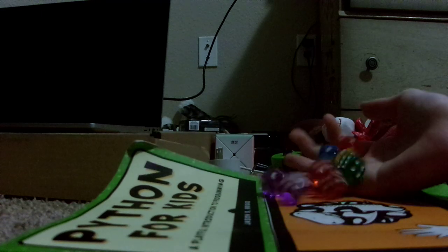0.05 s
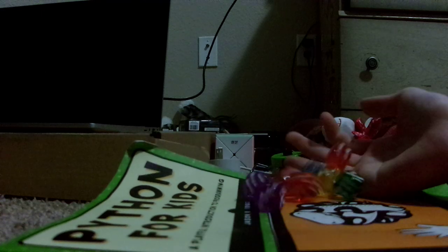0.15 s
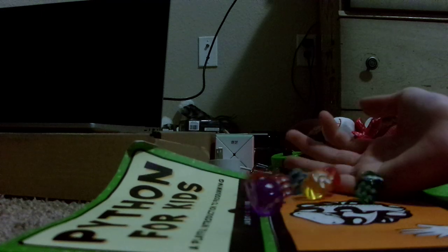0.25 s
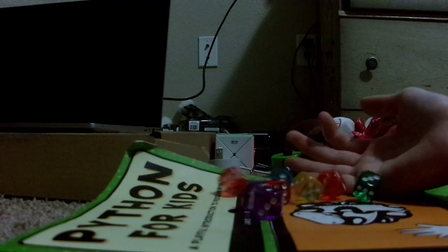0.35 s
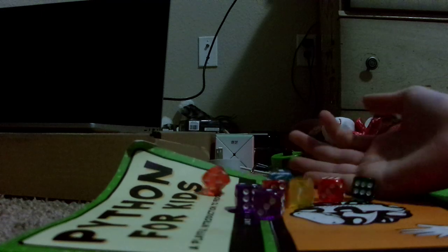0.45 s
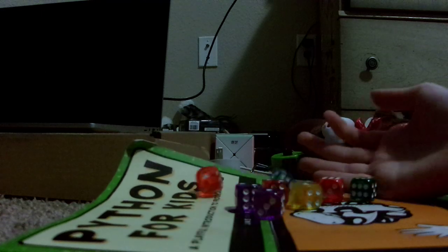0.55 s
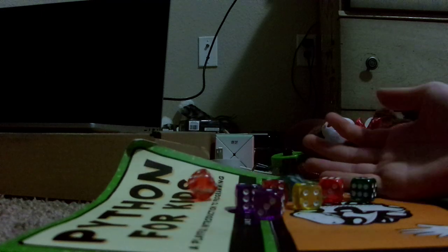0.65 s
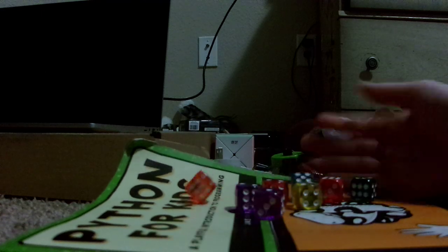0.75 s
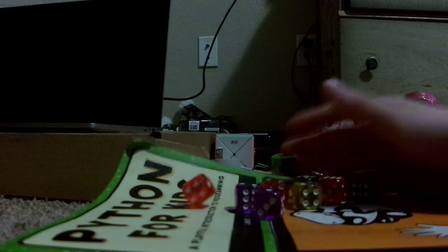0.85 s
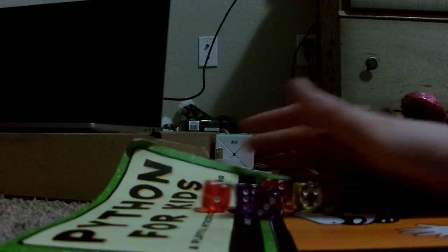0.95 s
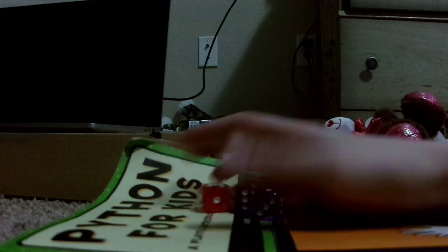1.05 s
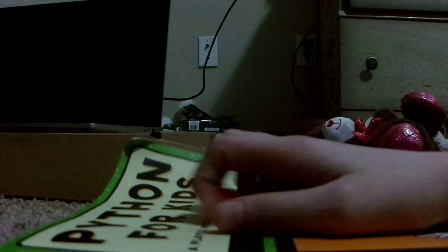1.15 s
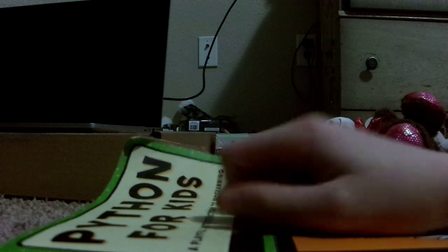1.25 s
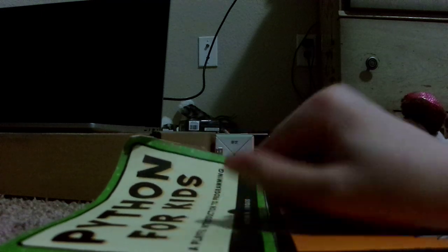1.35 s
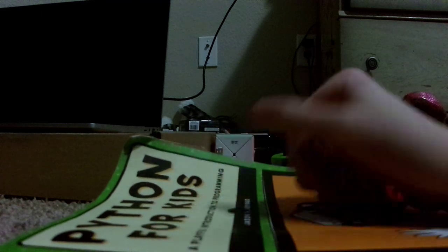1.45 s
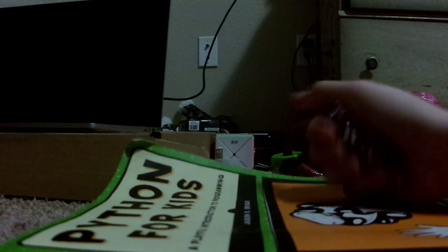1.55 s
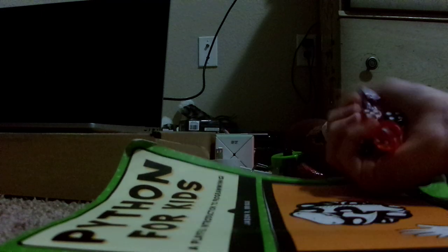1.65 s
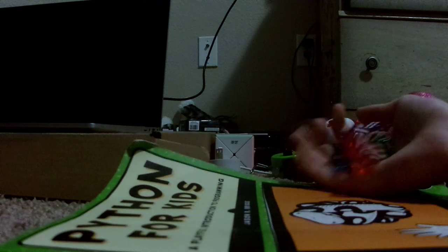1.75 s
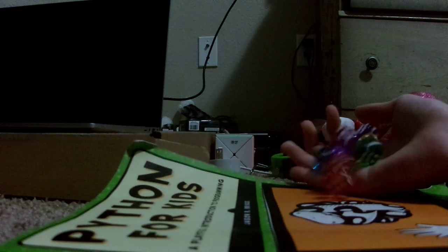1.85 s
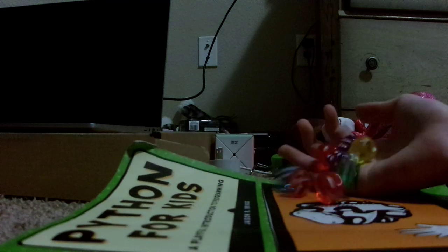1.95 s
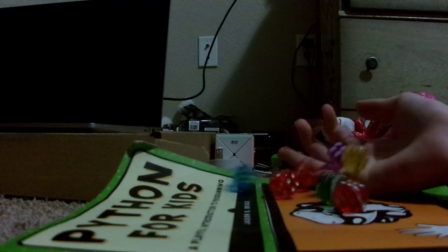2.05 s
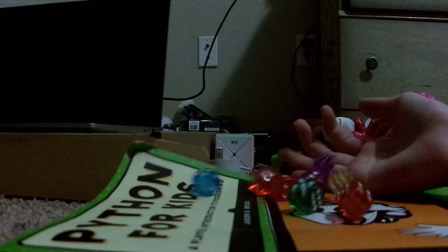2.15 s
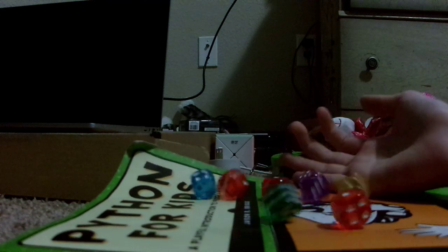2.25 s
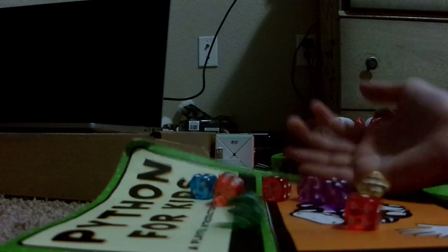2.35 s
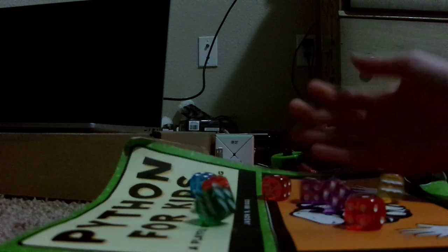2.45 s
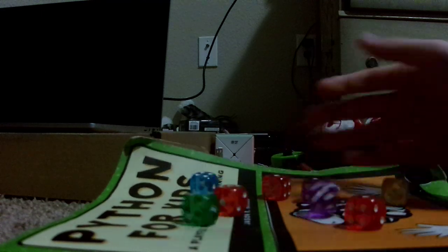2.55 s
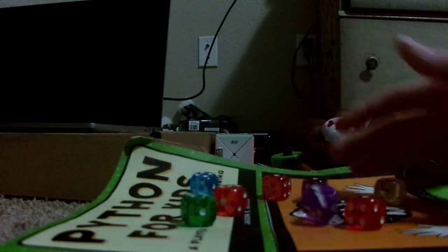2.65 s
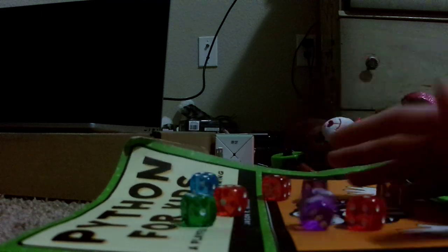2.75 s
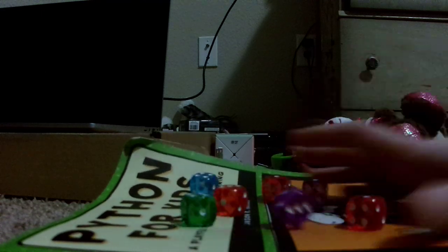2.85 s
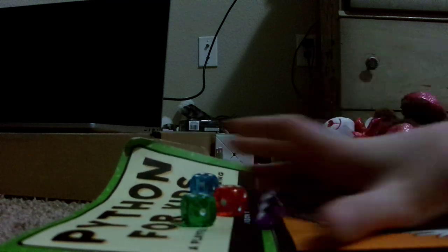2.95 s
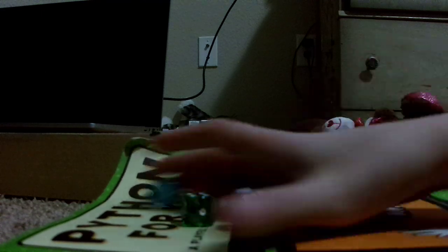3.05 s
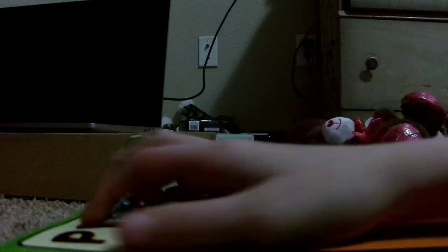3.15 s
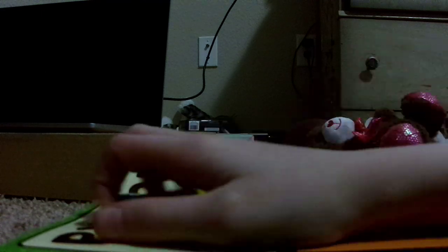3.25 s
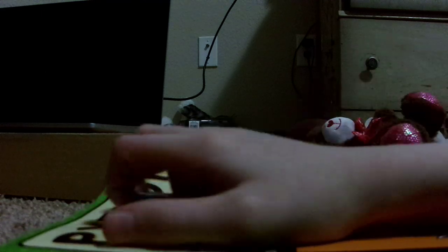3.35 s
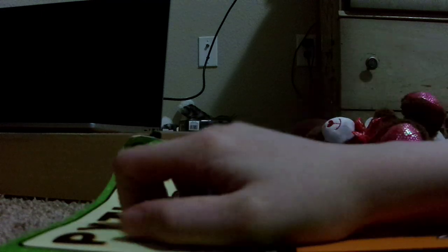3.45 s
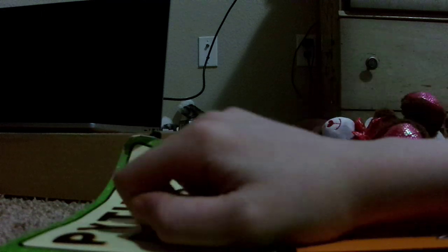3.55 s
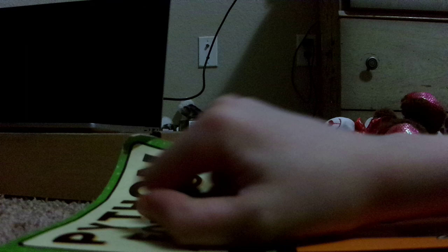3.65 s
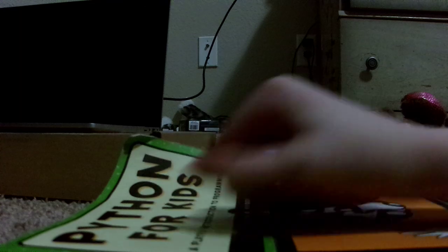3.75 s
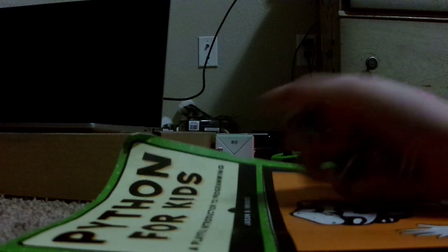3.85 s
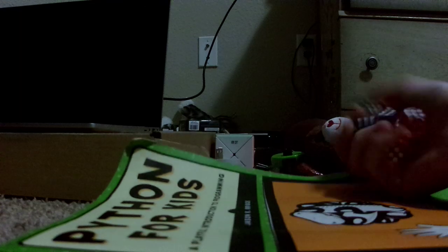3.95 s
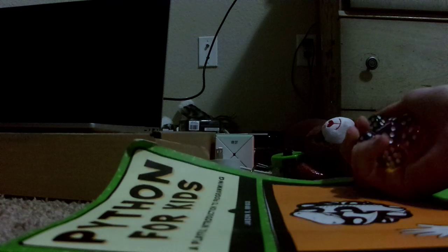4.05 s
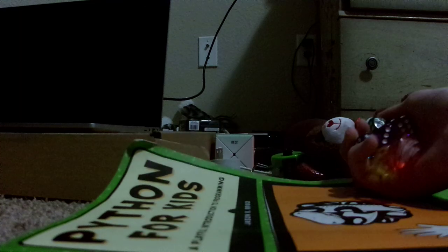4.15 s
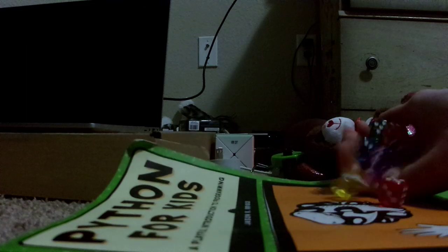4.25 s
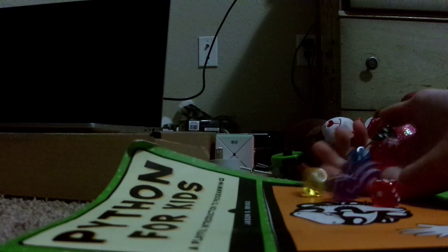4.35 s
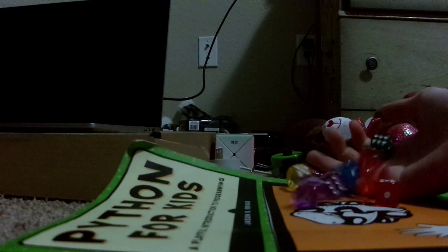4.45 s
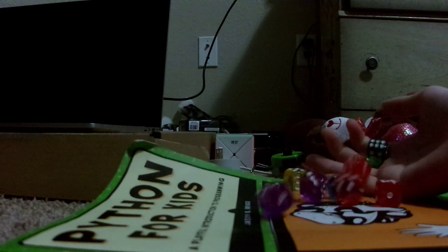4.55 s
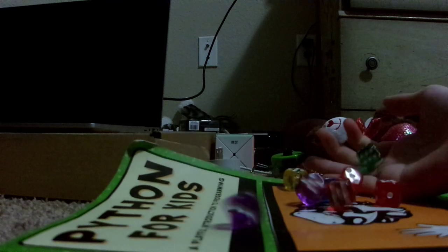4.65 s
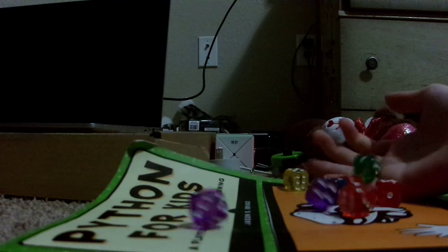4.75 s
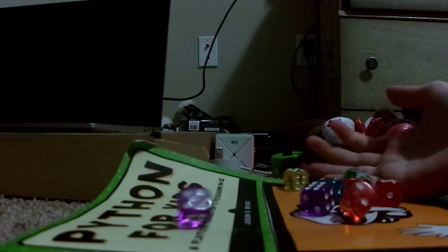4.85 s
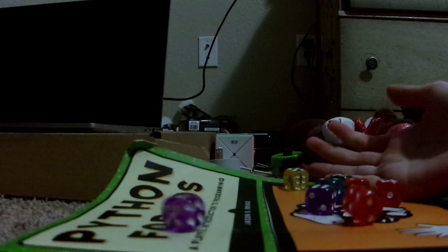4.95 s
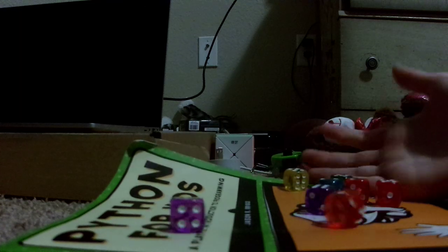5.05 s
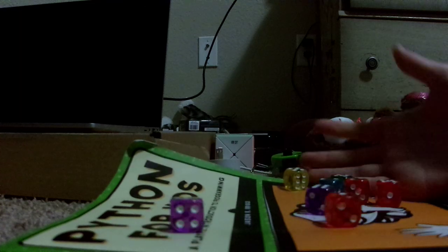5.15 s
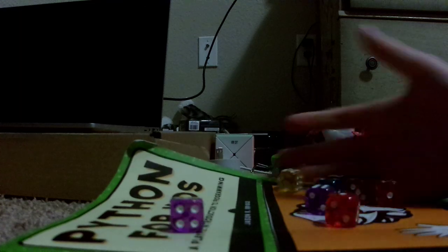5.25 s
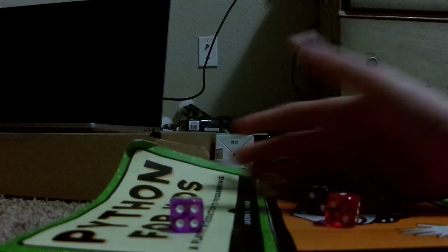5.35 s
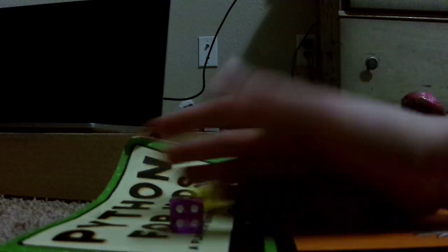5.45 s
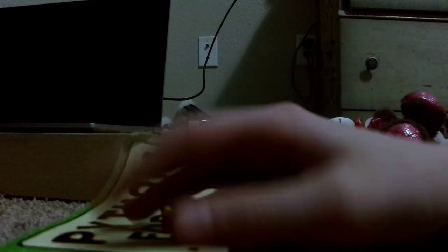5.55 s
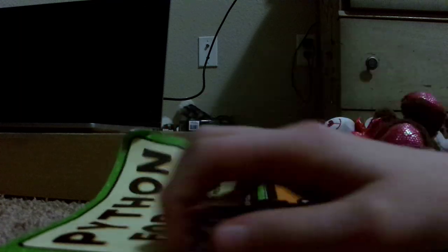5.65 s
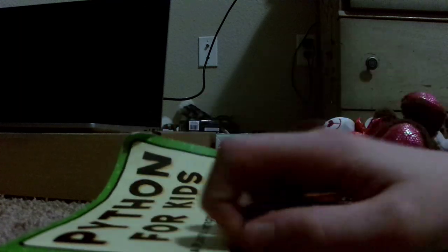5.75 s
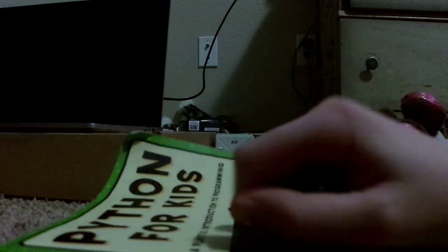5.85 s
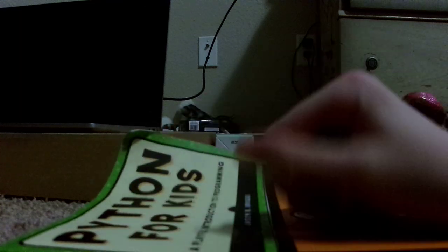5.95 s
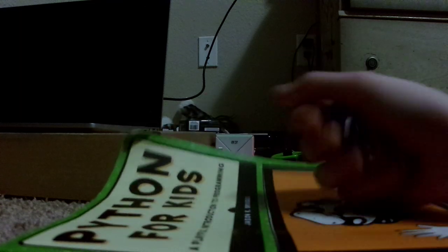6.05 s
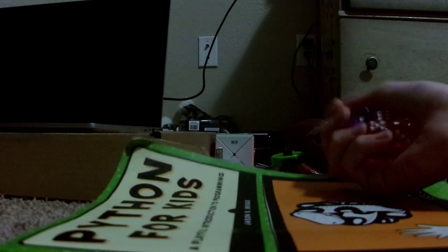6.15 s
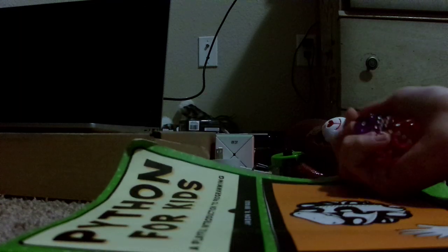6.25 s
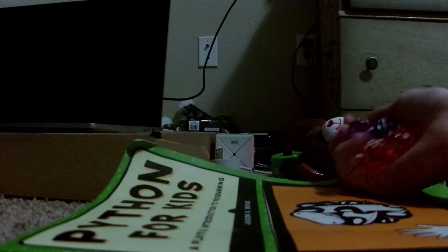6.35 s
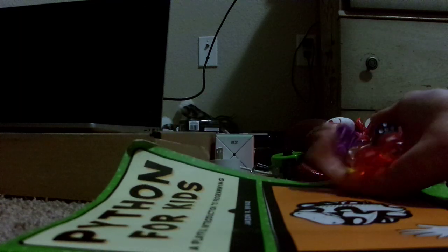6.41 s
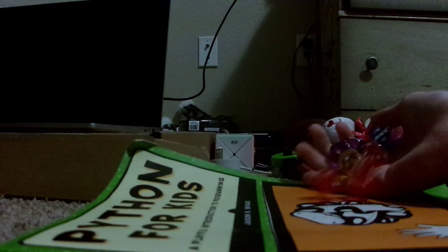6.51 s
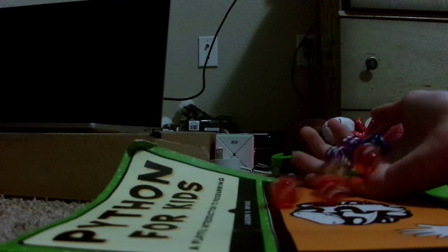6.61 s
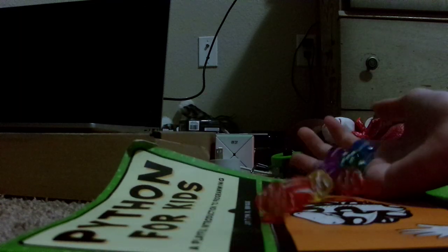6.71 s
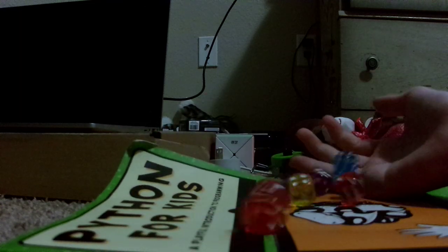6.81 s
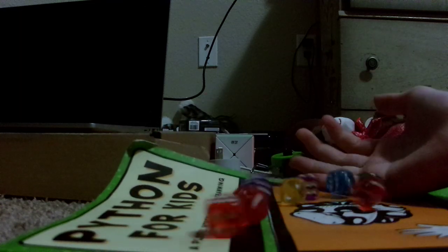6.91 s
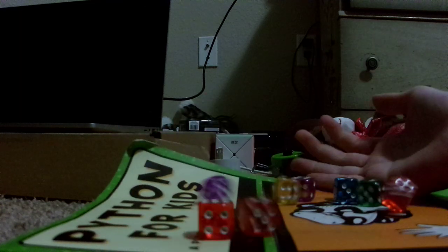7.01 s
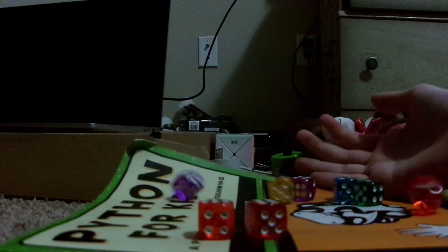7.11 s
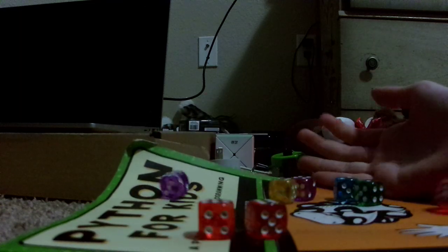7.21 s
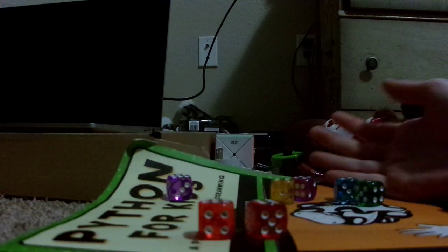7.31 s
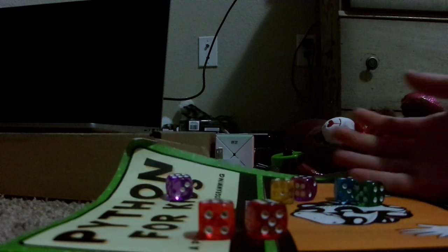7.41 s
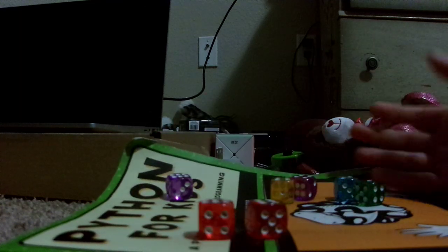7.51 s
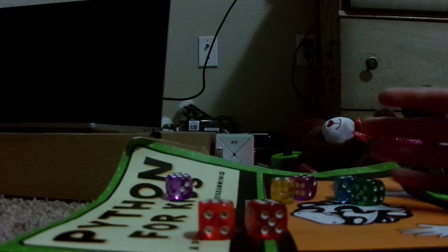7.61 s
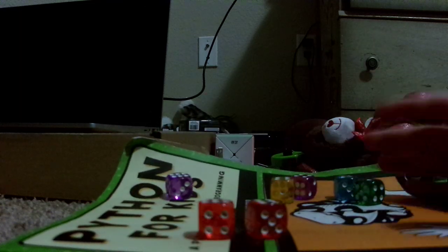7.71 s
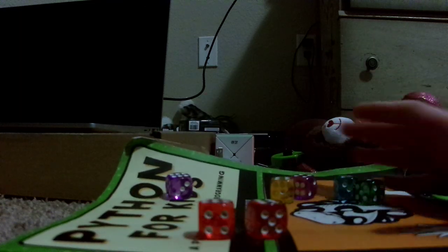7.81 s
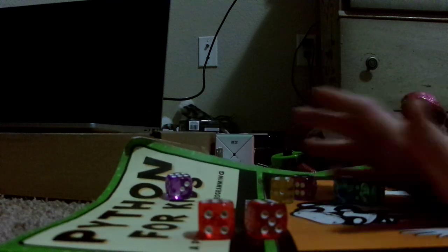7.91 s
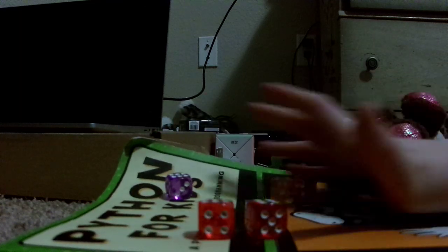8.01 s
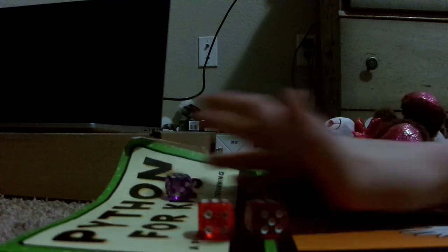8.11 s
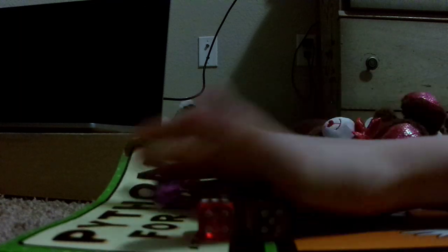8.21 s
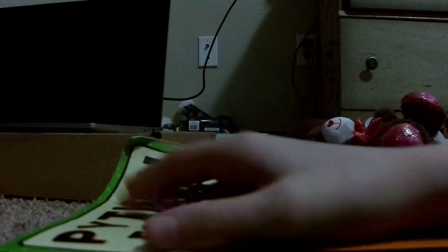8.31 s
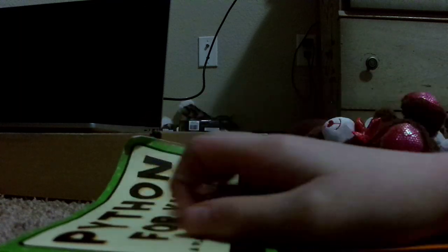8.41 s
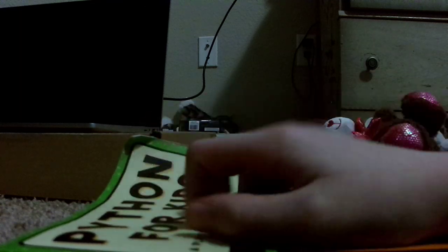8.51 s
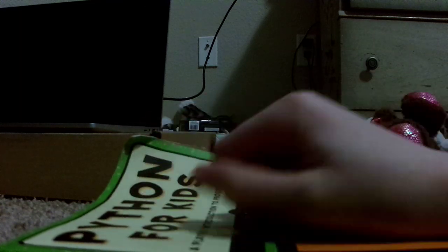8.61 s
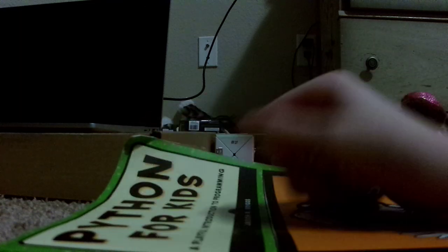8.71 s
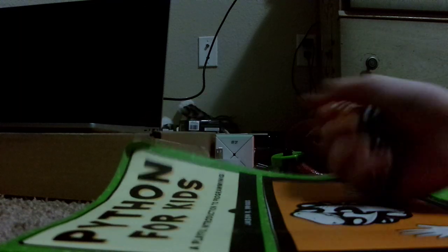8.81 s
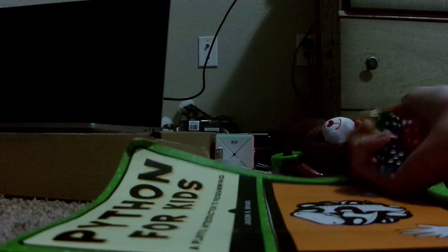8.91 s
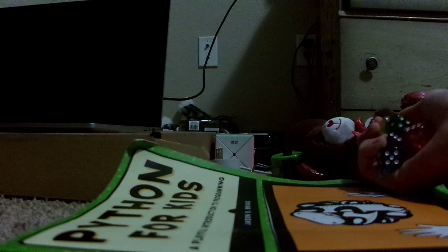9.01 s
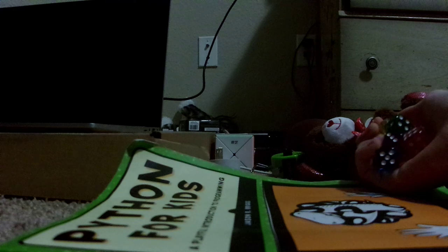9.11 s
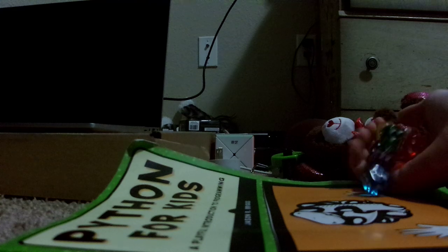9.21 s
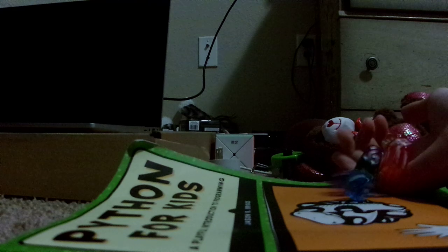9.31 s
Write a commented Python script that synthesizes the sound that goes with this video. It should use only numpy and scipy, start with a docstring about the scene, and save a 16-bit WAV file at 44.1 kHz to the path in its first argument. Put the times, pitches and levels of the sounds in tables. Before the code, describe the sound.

Close and dry in a small furnished room with faint low hum and soft hiss. At 0 s a handful of plastic dice is already spilling onto a hardback book, short hollow drumming and sharp clicks thinning out by about 0.6 s. From 1.0 to 1.3 s a hand rakes them up in a dense, bright clatter with scraping; they click in the palm until the second throw at 1.9 s, which settles near 2.7 s. Another rake, 2.9 to 3.5 s, peaks sharply around 3.3. After a muffled shuffle at 4.0, the third throw tumbles from 4.2 to 5.1 s. The sweep at 5.3 to 5.8 s is the loudest, crowded with clicks. A duller handling leads to the fourth throw, 6.5 to 7.1 s, then a quieter pause with light rustling. Dice are gathered at 8.0 to 8.6 s, shuffled at 8.9, and dropped again from 9.2 s.

```python
"""Dice thrown on a hardback book

Plastic dice are tipped from a hand onto a book lying on carpet, tumble to a stop, are swept up and thrown
again. Short damped modes make the clicks between dice, the drumming of the cover and the tap on it. Shaped
noise makes the rustle of hand and dice, the short noisy tail after each click, the still air and the hiss of
the microphone. A small furnished room answers the blows; a machine hums faintly; a small microphone listens
close by."""
import sys
import numpy as np
from scipy import signal
from scipy.fft import rfft, irfft, next_fast_len
from scipy.io import wavfile
from scipy.ndimage import uniform_filter1d, map_coordinates

SR = 44100
rng = np.random.default_rng(int(sys.argv[2]) if len(sys.argv) > 2 else 0)


def bounce(signal):
    """Save signal as a 16-bit WAV file at the path given by the first command-line argument."""
    frames = np.transpose(np.atleast_2d(signal))
    limited = np.clip(frames, -1, 1)
    pcm = np.round(limited * 32767).astype(np.int16)
    wavfile.write(sys.argv[1], SR, pcm)


N = 413216

# Levels are nominal: each source adds its own offsets and chance spread.
# dice thrown onto the cover: (start [s], time to rest [s], rolling level [dB])
THROWS = [(-0.05, 0.57, -48), (1.929, 0.78, -48.5), (4.24, 0.98, -50.5), (6.66, 0.87, -53),
          (9.299, 0.52, -56)]
# hand stroking or raking the cover: (peak [s], swell [s], fade [s], dull level [dB], bright level [dB])
SWEEPS = [(0.95, 0.074, 0.3, -89, -50.5), (1.12, 0.047, 0.19, -43.5, -38), (1.2, 0.13, 0.17, -40, -38),
          (1.28, 0.44, 0.044, -40, -44.5), (2.92, 0.11, 0.72, -56, -48.5), (3.15, 0.16, 0.52, -47, -47.5),
          (3.32, 0.049, 0.074, -40.5, -46), (3.404, 0.022, 0.02, -42.5, -26.5),
          (3.46, 0.18, 0.094, -60.5, -47.5), (5.33, 0.061, 0.49, -60.5, -41),
          (5.55, 0.27, 0.38, -46.5, -59), (5.7, 0.11, 0.144, -42.5, -37), (7.46, 0.23, 0.48, -67, -55.5),
          (7.85, 0.13, 0.042, -70, -48.5), (7.97, 0.29, 0.13, -65, -50), (8.084, 0.12, 0.53, -51, -45),
          (8.482, 0.19, 0.1, -40, -42.5), (8.586, 0.074, 0.099, -47, -46.5)]
# dice shifting while bunched in the palm or on the cover: (peak [s], swell [s], fade [s], dull [dB], bright [dB])
HANDFULS = [(1.78, 0.26, 0.15, -54, -55), (4.017, 0.037, 0.042, -48, -45), (4.843, 0.032, 0.02, -53, -71),
            (6.234, 0.21, 0.089, -67.5, -62.5), (6.33, 0.026, 0.063, -56, -77),
            (6.52, 0.11, 0.15, -56, -55.5), (8.921, 0.03, 0.14, -49.5, -59), (9.213, 0.025, 0.3, -52, -82),
            (9.303, 0.077, 0.072, -46.5, -45)]
# clear bounces on the cover: (time [s], drum level [dB], tap level [dB])
LANDINGS = [(0.016, -26, -29), (0.0357, -25.5, -25.5), (0.09, -32, -33), (0.1129, -29.5, -27),
            (0.1495, -25, -25), (0.1961, -20.5, -21.5), (0.2086, -28, -23), (0.2926, -27, -24.5),
            (0.323, -28, -35), (0.3403, -28, -35), (0.3699, -43, -35.5), (0.4268, -37, -40.5),
            (0.506, -36, -43), (0.6382, -32, -34.5), (0.847, -37.5, -35), (0.895, -42, -51),
            (1.862, -23.5, -24), (1.901, -17, -22), (1.9442, -29, -25.5), (1.9776, -24, -25.5),
            (2.0284, -45, -42), (2.0518, -29.5, -26.5), (2.072, -24, -25.5), (2.124, -29, -25),
            (2.2004, -27, -25.5), (2.2289, -29.5, -42), (2.343, -39, -36), (2.3881, -34, -58),
            (2.4123, -38.5, -44), (2.563, -36.5, -42), (2.5984, -39.5, -36.5), (2.646, -37.5, -41),
            (3.1184, -27.5, -24), (3.315, -24, -20.5), (4.2145, -19, -22), (4.223, -23.5, -25),
            (4.265, -32, -30), (4.3019, -33, -35), (4.3244, -26.5, -26.5), (4.366, -40, -39),
            (4.3905, -21, -24), (4.455, -29, -38), (4.4829, -26, -26.5), (4.494, -27.5, -26),
            (4.5296, -28.5, -29), (4.6006, -22.5, -24.5), (4.653, -30, -27), (4.6619, -30, -31.5),
            (4.694, -36.5, -38), (4.7582, -35, -36.5), (4.8627, -32.5, -31.5), (4.9006, -37, -36.5),
            (4.958, -39.5, -38.5), (5.0252, -38.5, -37), (5.5254, -30.5, -25.5), (5.5687, -29, -29),
            (5.6079, -28, -28), (6.507, -24, -27.5), (6.5475, -22.5, -22.5), (6.578, -30.5, -34.5),
            (6.6515, -22.5, -22.5), (6.6913, -32, -36), (6.6997, -23.5, -23), (6.7448, -26, -23),
            (6.777, -29, -32), (6.794, -27.5, -31), (6.8164, -27, -19), (6.919, -21.5, -30.5),
            (6.954, -25, -29), (7.043, -34, -37.5), (7.533, -44, -46), (8.3545, -31, -57),
            (8.471, -33, -35), (8.58, -32.5, -33.5), (9.2325, -23, -27.5), (9.2915, -25.5, -24),
            (9.3613, -24, -24)]
# clear contacts between dice: (time [s], level [dB], upper over lower modes [dB])
CLICKS = [(0.026, -24.5, 6), (0.0539, -20.5, 0.5), (0.0763, -29.5, -4), (0.0885, -21.5, 2.5),
          (0.138, -28.5, -1), (0.2259, -35.5, -3.5), (0.2445, -32.5, -1), (0.2522, -18.5, -5),
          (0.2964, -14, 7.5), (0.3475, -21, 25), (0.4588, -29, 10), (0.6416, -24, -6.5), (0.984, -16, 32),
          (0.9995, -13.5, 12.5), (1.0642, -21, 23), (1.0687, -15.5, 9), (1.076, -29, 20),
          (1.0881, -17.5, 3), (1.099, -21, 7), (1.104, -27.5, 30), (1.113, -18.5, 5), (1.1325, -23, 6),
          (1.1469, -19, -4), (1.1653, -20, -14.5), (1.1767, -16.5, -2), (1.1878, -19.5, 21.5),
          (1.1936, -13, -3.5), (1.1982, -19, -5.5), (1.22, -21, 11), (1.249, -22.5, -15),
          (1.2633, -10, 2.5), (1.3984, -30, -4), (1.423, -29.5, -18.5), (1.4812, -37.5, -8),
          (1.664, -14, 10), (1.696, -31.5, -19.5), (1.759, -26.5, 0.5), (1.7657, -21, 13),
          (1.7697, -15.5, 26), (1.7875, -25, -9.5), (1.8072, -22.5, 15), (1.8183, -32, 7),
          (1.83, -26.5, 12), (1.8814, -25.5, 7), (1.9227, -19.5, -6), (1.939, -29.5, -2.5),
          (1.9911, -30.5, -6.5), (2.1144, -24, 10), (2.1414, -24.5, -1), (2.1596, -25.5, 0.5),
          (2.2469, -27.5, -2), (2.494, -17, 4), (2.9258, -21, -4), (2.9465, -32.5, -8), (2.9589, -28, 0),
          (3.0593, -14, 3.5), (3.0893, -19, 0), (3.0964, -29, 9), (3.103, -23.5, 6), (3.1327, -29, 4),
          (3.154, -20.5, 11), (3.2042, -30.5, 7.5), (3.2172, -27.5, 12), (3.2427, -15, 1),
          (3.298, -24.5, -6.5), (3.3084, -10, 5), (3.3163, -24.5, -13), (3.33, -18.5, -5), (3.393, -22, 9),
          (3.4022, -17.5, 18.5), (3.4687, -30.5, 5), (3.4913, -23, 9), (3.9406, -30.5, -21),
          (3.9696, -27, -2), (3.989, -26, 2), (4.0087, -18, 7), (4.2194, -15.5, 10), (4.2825, -31.5, 1.5),
          (4.2927, -25.5, -9), (4.4065, -25.5, 14), (4.4339, -23.5, 19), (4.4559, -26.5, -6),
          (4.4612, -24, -13), (4.5195, -26, -2), (4.792, -16.5, -3.5), (4.83, -29.5, -5.5),
          (5.3048, -28.5, 1.5), (5.3157, -19, 25), (5.3224, -27, 20), (5.337, -15, 6.5), (5.3541, -18, 14),
          (5.3977, -23.5, 1), (5.414, -12.5, -1.5), (5.436, -19, -3), (5.4452, -16, -1),
          (5.4545, -7.5, 10.5), (5.5036, -20, -1.5), (5.5261, -13, 0.5), (5.6177, -19, 9.5),
          (5.6409, -21, 4.5), (5.6496, -17.5, 5), (5.6556, -14.5, 11), (5.6784, -13.5, 4),
          (5.6993, -22, -16.5), (5.703, -18, -10), (5.7242, -10.5, -6), (5.7427, -26.5, -9.5),
          (5.7764, -29.5, -1), (5.8044, -17.5, 0), (5.854, -25.5, -4.5), (5.913, -28, -15),
          (5.9413, -24.5, -16.5), (5.998, -31.5, -21), (6.194, -32, -22), (6.3069, -24.5, -12.5),
          (6.322, -32, -21), (6.416, -31.5, -11), (6.453, -26, -4), (6.4588, -30.5, -10), (6.4836, -26, 6),
          (6.6824, -23, 5), (6.7911, -30, -5), (6.863, -27, -7), (6.8834, -26, 13), (6.9915, -30, -7),
          (7.0666, -32.5, -10), (7.228, -36, 2), (7.9969, -24, 5.5), (8.0461, -19.5, 5.5), (8.0676, -22, 3),
          (8.0782, -17.5, 8), (8.089, -24, 10), (8.1894, -26, 2), (8.3556, -20, -8), (8.365, -23.5, 1),
          (8.384, -21.5, -4.5), (8.414, -21, -5), (8.4272, -22, 10), (8.4321, -11, 2), (8.444, -16.5, -10),
          (8.456, -13, 1), (8.465, -23.5, -4), (8.47, -17, -6), (8.4732, -16, 0), (8.48, -16, 5),
          (8.5673, -24.5, 4), (8.5753, -19, 1.5), (8.8398, -40.5, -16), (8.9059, -22.5, -11),
          (8.924, -34, -7), (8.9271, -21.5, -14), (8.9411, -25, -11), (9.203, -25, -20), (9.2471, -28, -8),
          (9.2517, -29.5, -11), (9.2944, -18.5, 10), (9.3082, -22.5, -1), (9.3133, -21, -1.5)]
# modes of the book cover: (frequency [Hz], relative level [dB], t60 [s])
COVER_MODES = [(264.6, -10.5, 0.066), (311.6, -4.5, 0.037), (350.8, 3.5, 0.029), (518, -13, 0.014),
               (750, -5.5, 0.016)]
# tap on the cover, the contact and then upper cover modes: (frequency [Hz], relative level [dB], t60 [s])
TAP_MODES = [(2150, 0, .0009), (900, -18, .007), (1500, -14, .005), (2600, -13, .003)]
# lower modes of a die: (frequency [Hz], relative level [dB], t60 [s])
DIE_LOW_MODES = [(3000, -4, .0014), (5100, 0, .0016)]
# upper modes of a die: (frequency [Hz], relative level [dB], t60 [s])
DIE_HIGH_MODES = [(6900, -1, .0012), (9600, 0, .0016), (13500, -5, .0008)]
# hollow of the hand around the dice: (frequency [Hz], relative level [dB], t60 [s])
HOLLOW_MODES = [(3100, 0, .008)]
# dull friction noise: (frequency [Hz], relative density [dB])
SCRAPE_SPECTRUM = [(600, -6.5), (1400, -5), (3500, -1.5), (9000, -24.5)]
# bright friction noise: (frequency [Hz], relative density [dB])
RUSTLE_SPECTRUM = [(4000, -14.5), (10000, 9.5), (16000, 6.5)]
# still air, lower part: (frequency [Hz], relative density [dB])
AIR_SPECTRUM = [(24, -53), (40, 1.5), (75, 1.5), (168, 0), (211, 0), (887, -19.5)]
# microphone hiss, treble: (frequency [Hz], relative density [dB])
TREBLE_SPECTRUM = [(2310, -21), (5000, -25), (10000, -27), (15300, -29), (16500, -45)]
# machine hum: (frequency [Hz], middle rms level [dB])
HUM_TONES = [(26.9, -57), (82, -65.5), (120, -66), (164, -62)]
# decay of the room: (frequency [Hz], t60 [s])
ROOM_DECAY = [(300, 0.25), (700, 0.14), (10000, 0.084)]

STEP = 32  # samples between control values
SPILL_S, SLOWING_DB_PER_S, SETTLE_S = 0.0097, 12, 0.026  # rise by 20 dB, loss while rolling, extra 20 dB fall at rest
PUSH_DB = -5  # rolling of raked dice, relative to the dull sweep
ROLL_DULL_DB, ROLL_BRIGHT_DB = -19, -20.5  # rustle relative to the rolling level
JOSTLE_ROLL_DB, JOSTLE_PALM_DB, JOSTLE_RAKE_DB = -3.5, 15, -0.5  # relative to rolling, dull handful, dull sweep
SKIN_PATCHY_DB = 1.5
STICK_SLIP_DB = 1.2  # extra unevenness of a firm rake
HOLLOW_DB, EDGE_DB = -9, -10.5  # hollow relative to a dull click; a die's low modes relative to its listed tap
BUZZ_DB, BUZZ_S = -16, 0.0015  # relative to the click; fade to 1/e
CHATTER_DB, CHATTER_GAP_SCALE_S, CHATTER_LOSS_DB = -9, .0009, 1.07  # start under the click, gap scale, loss a tick
PORT_HZ, PORT_WIDTH_HZ, TOP_HZ = 9810, 7460, 16000  # inlet resonance of the microphone and band limit


def amp(db):
    """Logarithmic level: decibels to gain."""
    return 10 ** (np.asarray(db) / 20)


def unit(x):
    """Power normalisation: scales to rms 1."""
    return x / np.sqrt(np.mean(x ** 2) + 1e-20)


def summed(levels_db):
    """Incoherent superposition: powers add."""
    return 10 * np.log10(sum(amp(db) ** 2 for db in levels_db) + 1e-11)


def along(points, hz):
    """Logarithmic frequency axis: interpolates (frequency, value) points."""
    f, value = np.transpose(points)
    return np.interp(np.log(hz + 1), np.log(f + 1), value)


def wobble(rate):
    """Slow random modulation: a smooth curve with rate knots a second."""
    knots = rng.standard_normal(int(N * rate / SR) + 4)
    return map_coordinates(knots, [np.arange(N) * rate / SR])


def filtered(x, response):
    """Linear filtering: the spectrum is multiplied by a response of frequency."""
    m = next_fast_len(N + 8192)
    return irfft(rfft(x, m) * response(np.fft.rfftfreq(m, 1 / SR)), m)[..., :N]


def highpass(x, hz):
    """Poor radiation by small bodies: bass is removed below hz."""
    return signal.lfilter(*signal.butter(2, hz, "high", fs=SR), x)


def hiss(spectrum, patchy_db):
    """Coloured noise of rms 1: random gain patches in time and frequency, then a spectral envelope."""
    z = signal.stft(rng.standard_normal(N + SR), nperseg=512)[2]
    field = uniform_filter1d(rng.standard_normal(z.shape), size=12, axis=0)
    field = uniform_filter1d(field, size=6, axis=1)
    x = signal.istft(z * amp(patchy_db * unit(field)), nperseg=512)[1][:N]
    return unit(filtered(x, lambda hz: amp(along(spectrum, hz))))


def struck(times, db, modes, size, rise_s, spread_db, detune):
    """Modal excitation: each blow lands elsewhere, so mode strengths and pitches change a little."""
    t = np.arange(size) / SR
    hz, level_db, t60 = np.transpose(modes)[:, None, :, None]
    chance = rng.standard_normal((len(times), 2, len(modes), 1))
    decay = amp(level_db + spread_db * chance[:, 0] - 60 * t / t60)
    ring = decay * np.sin(2 * np.pi * hz * np.exp(detune * chance[:, 1]) * t)
    ring = -ring.sum(axis=1) * (1 - np.exp(-t / rise_s))
    ring *= (amp(db) / np.abs(ring).max(axis=1))[:, None]
    at = np.round(np.asarray(times) * SR).astype(int)[:, None] + np.arange(size)
    return np.bincount(at.ravel(), ring.ravel(), N + size)[:N]


def scattered(count, spread_db):
    """Random impacts: sample positions, sizes in dB (many small, few large) and colours from -1 to 1."""
    draw = rng.random((count, 3))
    at = (draw[:, 0] * (N - 1)).astype(int)
    return at, -spread_db * np.log(draw[:, 1] + .04), 2 * draw[:, 2] - 1


def control_times():
    """Slow modulation sampled sparsely: seconds at which levels are worked out."""
    return np.arange(N // STEP + 1) * STEP / SR


def gestures(rows):
    """Exponential swell and fade: dull and bright levels change by 20 dB in the times given."""
    t = control_times()
    shapes = [(-20 * np.maximum((s - t) / swell_s, (t - s) / fade_s), db) for s, swell_s, fade_s, *db in rows]
    return [summed(shape + db[k] for shape, db in shapes).repeat(STEP)[:N] for k in range(2)]


def background():
    """Stationary noise and wavering tones: still air, microphone hiss and machine hum."""
    t = np.arange(N) / SR
    hum = 0
    for hz, db in HUM_TONES:
        gain = amp(db + 2.37 * wobble(7)) * np.sqrt(2)
        hum = hum + gain * np.sin(2 * np.pi * hz * t + .7 * wobble(9))
    return hum + amp(-61.5) * hiss(AIR_SPECTRUM + TREBLE_SPECTRUM, patchy_db=-2.0)


def rolling():
    """Energy loss in rolling: the level in dB as thrown dice spill, slow down evenly and come to rest."""
    t = control_times()
    levels_db = []
    for s, rest_s, db in THROWS:
        spill_db = 20 * np.maximum(s - t, 0) / SPILL_S
        slowing_db = SLOWING_DB_PER_S * np.maximum(t - s, 0)
        settle_db = 20 * np.maximum(t - s - rest_s, 0) / SETTLE_S
        levels_db.append(db - spill_db - slowing_db - settle_db)
    return summed(levels_db).repeat(STEP)[:N]


def tick(s, dull_db, bright_db):
    """Hard elastic impact: die modes last a millisecond or two; so small a body sends out no bass."""
    low = struck(s, dull_db, DIE_LOW_MODES, size=120, rise_s=.00006, spread_db=3.5, detune=.18)
    high = struck(s, bright_db, DIE_HIGH_MODES, size=120, rise_s=.00004, spread_db=3.5, detune=.1)
    return highpass(low + high, 2000)


def knock(s, drum_db, tap_db):
    """Damped plate modes: the cover drums with a dry tap; so small a board sends out no deep bass."""
    drum = struck(s, drum_db, COVER_MODES, size=3000, rise_s=.0032, spread_db=4, detune=.05)
    tap = struck(s, tap_db + 4, TAP_MODES, size=500, rise_s=.00006, spread_db=4, detune=.25)
    return highpass(drum + tap, 235) + tick(s, tap_db + EDGE_DB, tap_db + EDGE_DB + 4.0)


def tumbling():
    """Rolling as repeated impact: dice turn over their edges in many small knocks."""
    level_db = summed([rolling(), gestures(SWEEPS)[0] + PUSH_DB])
    at, db, colour = scattered(count=750, spread_db=4.0)
    db += level_db[at] + 5.5
    return knock(at / SR, db + 0.5, db + 1.5 + 4 * colour)


def jostling():
    """Random collisions: dice that roll together bump now and then; in a palm or raked up they rattle."""
    palm_db = summed([gestures(HANDFULS)[0] + JOSTLE_PALM_DB, gestures(SWEEPS)[0] + JOSTLE_RAKE_DB])
    bumps = [(rolling() + JOSTLE_ROLL_DB, scattered(count=900, spread_db=3.5)),
             (palm_db, scattered(count=1100, spread_db=4.0))]
    total = 0
    for level_db, (at, db, colour) in bumps:
        db = level_db[at] + db
        total = total + tick(at / SR, db - 5 * colour, db - 7.0 + 5 * colour)
    return total


def sliding():
    """Stick-slip friction: dragged dice chatter in dense ticks over skin noise; a soft touch mostly hisses."""
    dull_db, bright_db = gestures(SWEEPS + HANDFULS)
    roll_db = rolling()
    dull_db = summed([dull_db, roll_db + ROLL_DULL_DB])
    bright_db = summed([bright_db, roll_db + ROLL_BRIGHT_DB])
    firm = np.clip((dull_db + 64) / 12, 0, 1)  # 0 stroking, 1 raking
    catch_db = (3 + STICK_SLIP_DB * firm) * wobble(70)  # dice catch and let go
    at, db, colour = scattered(count=4000, spread_db=4.0)
    db += catch_db[at] - 20 * (1 - firm[at])
    chatter = tick(at / SR, dull_db[at] + db + 4 - 5 * colour, bright_db[at] + db + 0.5 + 5 * colour)
    skin = amp(dull_db) * hiss(SCRAPE_SPECTRUM, patchy_db=SKIN_PATCHY_DB)
    skin += amp(bright_db - 9.0) * hiss(RUSTLE_SPECTRUM, patchy_db=SKIN_PATCHY_DB)
    return chatter + amp(catch_db - 9.5 * firm) * skin


def room(x):
    """Reverberation as decaying noise: each frequency dies at its own speed."""
    hz, t, z = signal.stft(rng.standard_normal(SR // 3), SR, nperseg=128)
    tail = signal.istft(z * amp(-60 * t / along(ROOM_DECAY, hz)[:, None]), SR, nperseg=128)[1]
    return signal.fftconvolve(x, tail / np.linalg.norm(tail))[:N]


def landings():
    """Impact on a plate: the clear bounces on the cover."""
    return knock(*np.transpose(LANDINGS))


def fading_buzz(s, level_db, spectrum):
    """Short noisy tail: after each click a burst of noise dies away exponentially."""
    starts = np.bincount((s * SR).astype(int), amp(level_db + BUZZ_DB), N)
    envelope = signal.lfilter([1], [1, -np.exp(-1 / (BUZZ_S * SR))], starts)
    return envelope * hiss(spectrum, patchy_db=SKIN_PATCHY_DB)


def clicks():
    """Impact and cavity resonance: clear contacts leave a brief noisy tail; dull ones in the hand also ring its
    hollow."""
    s, db, bright_db = np.transpose(CLICKS)
    held = rolling()[(s * SR).astype(int)] < -75  # no thrown dice are rolling
    muffled_db = np.minimum(-bright_db - 17.5, 0)
    hollow_db = (db + muffled_db + HOLLOW_DB)[held]
    hollow = struck(s[held], hollow_db, HOLLOW_MODES, size=500, rise_s=.0003, spread_db=0, detune=.1)
    low_db = db - np.maximum(bright_db, 0)
    high_db = db - 0.5 + np.minimum(bright_db, 0)
    buzz = fading_buzz(s, low_db, SCRAPE_SPECTRUM[1:]) + fading_buzz(s, high_db, RUSTLE_SPECTRUM)
    return tick(s, low_db, high_db) + highpass(buzz, 2000) + hollow


def chattering():
    """Successive impacts losing energy: under a raking hand a click runs on as a quick dying train of ticks."""
    s, db, bright_db = np.transpose(CLICKS)[:, :, None]
    raked = gestures(SWEEPS)[0][(s[:, 0] * SR).astype(int)] > -52
    draw = rng.random((len(s), 3, 13))
    at = s + np.cumsum(CHATTER_GAP_SCALE_S * (.4 - np.log(draw[:, 0] + .05)), axis=1)
    level_db = db + CHATTER_DB - CHATTER_LOSS_DB * np.arange(at.shape[1]) - 9 * draw[:, 1]
    tilt_db = bright_db / 2 + 10 * draw[:, 2] - 5
    low_db = level_db - np.maximum(tilt_db, 0)
    high_db = level_db + np.minimum(tilt_db, 0)
    return tick(at[raked].ravel(), low_db[raked].ravel(), high_db[raked].ravel())


def scene():
    """Superposition of sources: the blows also sound through the room."""
    ticks = clicks() + chattering() + jostling()
    knocks = landings() + tumbling()
    echo = amp(-20) * room(ticks) + amp(-10.0) * room(knocks)
    return (ticks + knocks + echo + sliding())[None]


def record(dry):
    """Inlet resonance: it peaks broadly and dulls the treble above; background joins; the band is limited."""
    def port(hz):
        return (PORT_HZ ** 2 / (PORT_HZ ** 2 - hz * hz + 1j * hz * PORT_WIDTH_HZ)) ** 2
    return filtered(filtered(dry, port) + background(), lambda hz: hz < TOP_HZ)


dry = scene()
out = record(dry)
bounce(out)
```